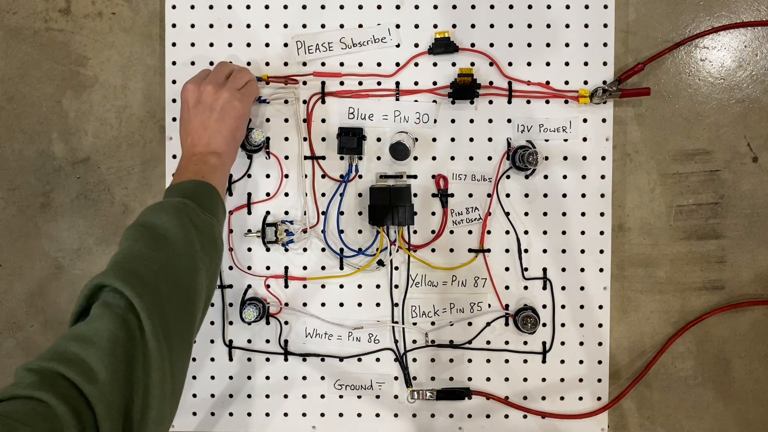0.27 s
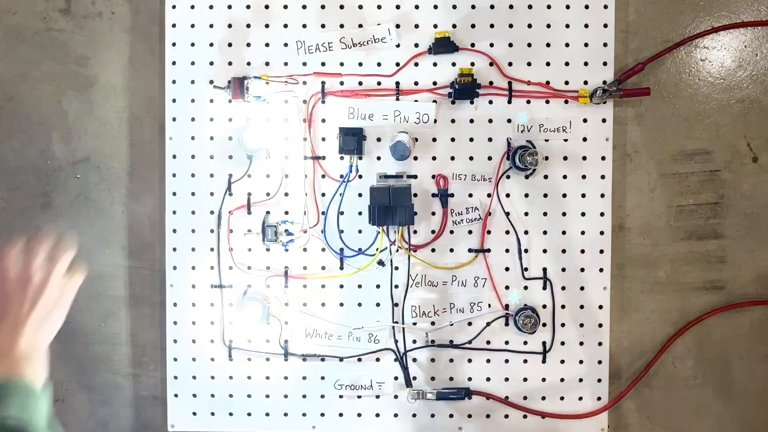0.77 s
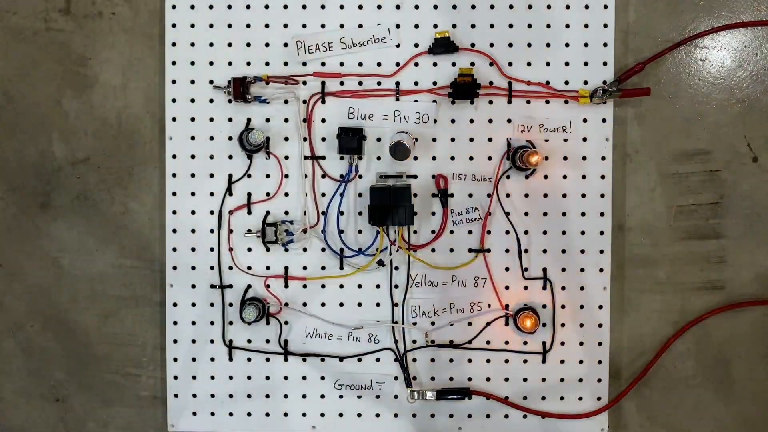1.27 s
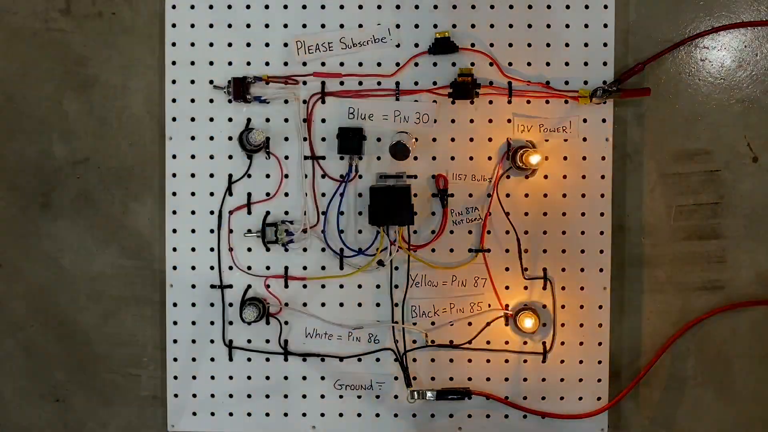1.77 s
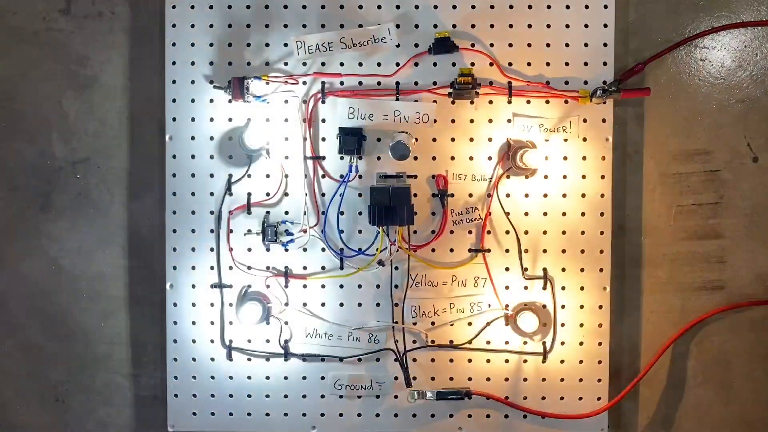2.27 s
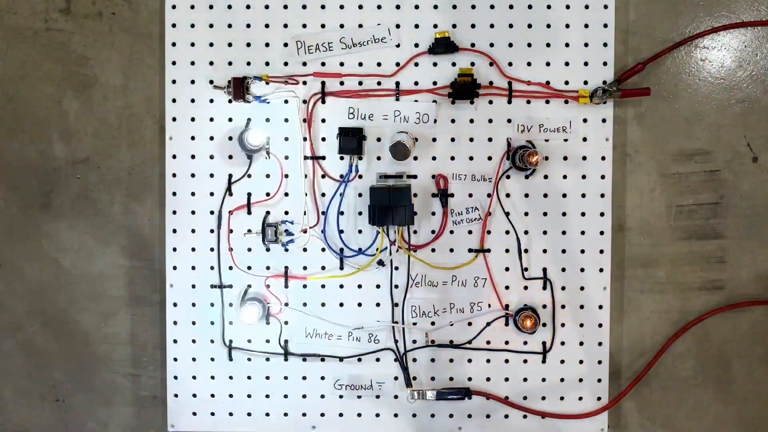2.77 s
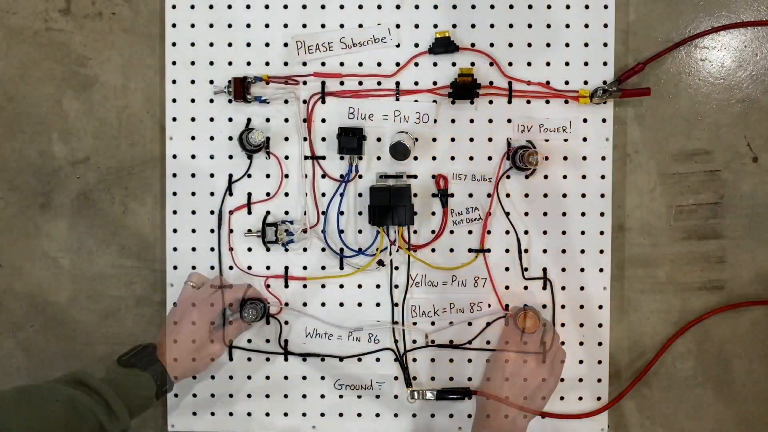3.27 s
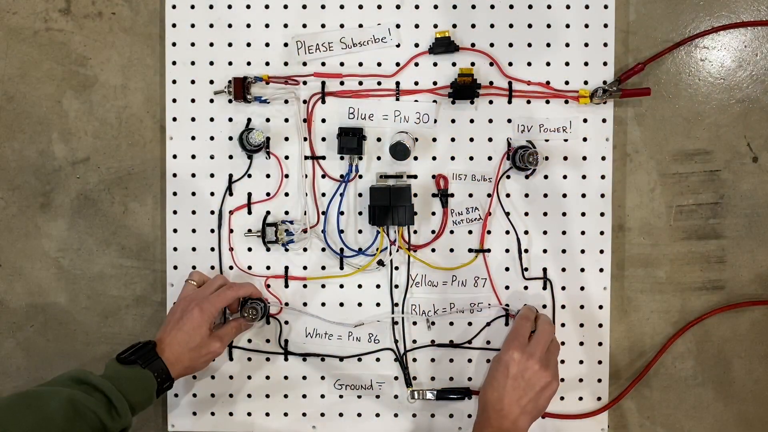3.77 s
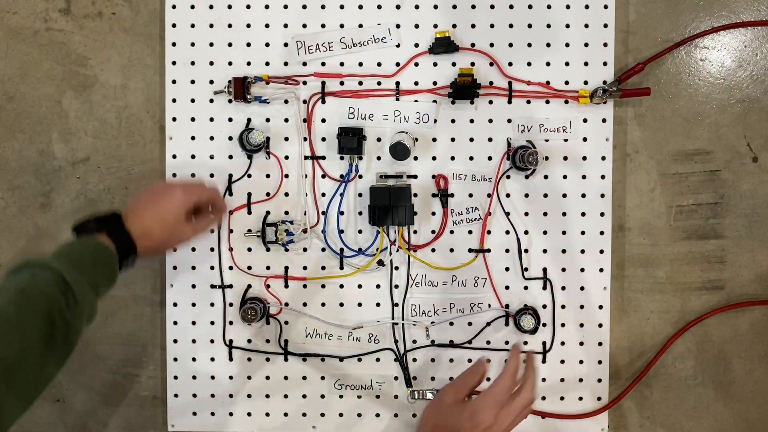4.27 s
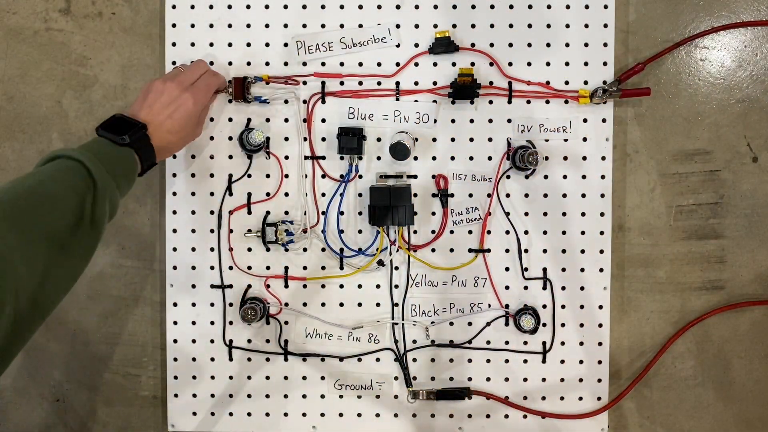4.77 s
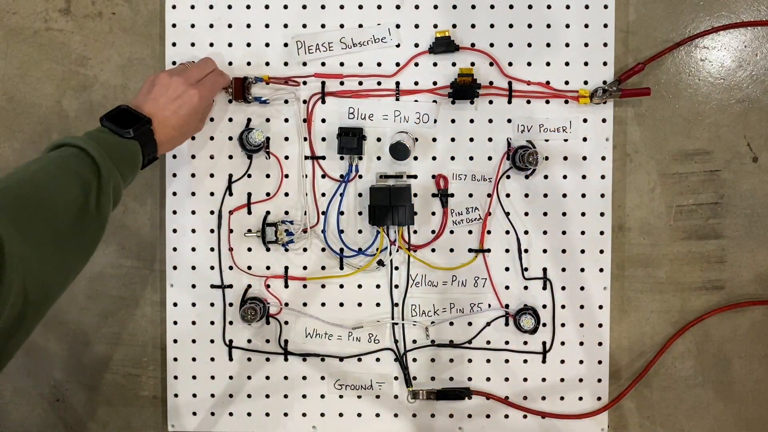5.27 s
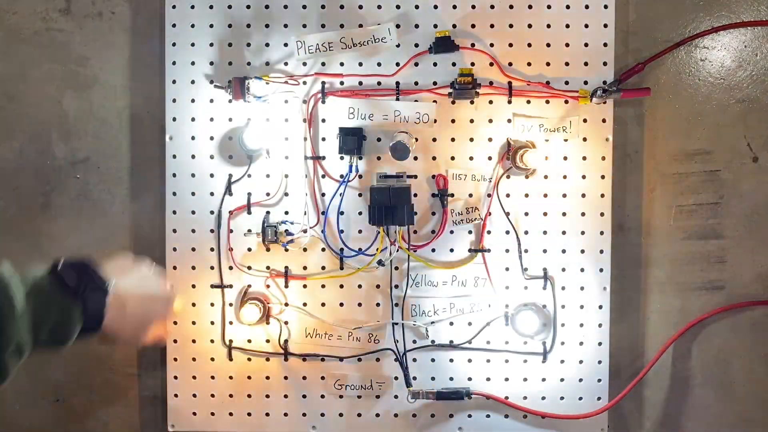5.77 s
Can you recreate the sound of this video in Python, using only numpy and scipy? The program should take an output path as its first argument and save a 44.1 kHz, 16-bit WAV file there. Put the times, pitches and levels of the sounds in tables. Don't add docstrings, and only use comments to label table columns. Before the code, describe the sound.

A close, quiet stereo scene in a concrete garage. Soft finger touches and a dull knock at 0.14 s lead to a very sharp toggle snap at 0.26 s, several contact bounces within about twenty milliseconds, with bright ringing and a short hard-walled tail; a softer knock follows near 0.48. From 0.55 to about 2.2 a far bird gives five hoarse, evenly spaced caws over a faint, pulsing 73 Hz vehicle drone. Small dry ticks dot 1.1 to 3.0. From 3.0 the vehicle nears: rumble, tyre roar and low engine surges swell, strongest around 4.2 to 5. At 3.57 a crisp tick starts hand scrapes, dull knocks and short socket creaks until about 4.0. Light rubs and taps resume at 4.5. A second, slightly softer switch snap hits at 5.15 and rings. A light tap at 5.5, then faint rubbing under a deep, steady engine boom to the end, just past 6.

```python
import sys
import numpy as np
from scipy import signal
from scipy.fft import rfft, irfft, next_fast_len
from scipy.io import wavfile

SR = 44100
rng = np.random.default_rng(int(sys.argv[2]) if len(sys.argv) > 2 else 0)


def store_pcm(level_fs):
    pcm = np.round(np.clip(level_fs, -1, 1) * 32767).astype(np.int16)
    wavfile.write(sys.argv[1], SR, np.atleast_2d(pcm).T)


def gain_from_db(level_db):
    decades = np.asarray(level_db, float) / 20
    return 10 ** decades


N = 265085

# f/Hz, level/dB
RUMBLE_SPECTRUM = [(15, -62), (25, -37.5), (49, -8), (70, -11.5), (83, -16.5), (97, -15.5), (204, -22),
                   (245, -17.5), (1000, -51), (1300, -75.5), (2200, -120)]
# f/Hz, level/dB
ROAR_SPECTRUM = [(240, -20.5), (400, -1.5), (431, -7.5), (499, -5), (715, -6.5), (1180, -15), (3210, -32.5),
                 (5000, -40.5), (6500, -52), (11000, -120)]
# f/Hz, level/dB
AIR_SPECTRUM = [(25, -12.5), (60, 1.5), (150, -6.5), (500, -34), (1500, -41.5), (3000, -40), (5500, -40.5),
                (10000, -48.5), (16000, -60)]
AIR_DB = -61.5
# far level/dB, drift/(dB/s), arrival t/s, rise/s, near level/dB, fade/(dB/s)
RUMBLE_PASS = (-71, .8, 3, 0.32, -44, 0.84)
# far level/dB, drift/(dB/s), arrival t/s, rise/s, near level/dB, fade/(dB/s)
ROAR_PASS = (-69, -2.5, 3.17, .16, -51, 3.5)
# t/s, level/dB
CAWS = [
    (.55, -62),
    (.845, -61.5),
    (1.144, -61.5),
    (1.456, -61.5),
    (1.774, -60.5),
]
# f/Hz, width/Hz, level/dB
THROAT = [(1265, 70, 4.5), (1355, 90, 6), (1435, 70, 4), (1775, 53, 0), (2075, 240, -5)]
# t/s, length/s, f/Hz, glide/(Hz/s), level/dB
DRONE = [(.05, 0.13, 73.4, -15, -59.5), (.2, 0.11, 74.8, 0.1, -59), (.33, 0.15, 73, -2, -58),
         (.6, 0.17, 74, 28, -56.5), (.79, 0.098, 76, -7, -49), (.96, 0.54, 73.75, 0.1, -50),
         (1.52, 0.21, 73.4, 1, -55), (1.66, 0.42, 72.8, 0.5, -49.5), (2.05, .24, 72.5, 0, -44.5),
         (2.25, .15, 73.5, -3, -53), (2.46, .1, 73.7, 1.5, -52), (2.54, 0.36, 72.4, 0, -52.5)]
# t/s, length/s, f/Hz, glide/(Hz/s), level/dB
SURGES = [(2.9, 0.24, 58, -1.3, -54), (3.28, 0.366, 66, 0.5, -41.5), (3.6, 0.16, 65.8, -4, -40),
          (3.77, 0.12, 65, 5, -37), (3.88, 0.18, 65.1, 1, -38.5), (4.7, 0.13, 66, 10, -35.5),
          (4.18, 0.15, 66.5, 45, -29.5), (4.33, 0.195, 43, 41, -34.5), (4.48, 0.12, 55, 34, -31),
          (4.28, 0.13, 66, -39, -39), (4.05, .15, 58, 70, -38), (3.93, .08, 262, 0, -47),
          (4.05, .12, 285, 60, -50), (4.23, .08, 318, 0, -48), (4.56, .1, 192, 0, -47),
          (5.83, .07, 290, 0, -48), (3.25, 0.22, 199, 3.5, -47.5), (2.95, 0.35, 51, -1.5, -55),
          (3.2, 0.48, 55, -2.5, -50.5), (3.66, 0.15, 52, 1, -40), (4.4, .32, 53, -2, -47),
          (4.57, .16, 60, 20, -41), (3.08, 0.506, 196, 7, -54), (3.62, 0.204, 197, -10, -45.5),
          (4.5, 0.18, 210, 7, -50.5), (4.66, 0.236, 259, -4, -50)]
# t/s, f/Hz, level/dB
FIRING = [
    (3.03, 129.1, -61.5),
    (3.36, 132.6, -48),
    (3.55, 130.6, -46.5),
    (3.8, 131, -47.5),
    (4.05, 130, -49),
    (4.37, 129, -48.5),
    (4.65, 127.1, -46),
    (5.3, 125.7, -58.5),
    (5.7, 132, -57.5),
]
# multiple of firing f, level/dB
FIRING_ORDERS = [(1, 0.15), (1.5, -9.5), (2, -10.5)]
# t/s, f/Hz, level/dB
BOOM = [
    (4.66, 64.6, -46),
    (4.75, 64.1, -35),
    (4.89, 63.48, -27.5),
    (4.99, 66.9, -29),
    (5.29, 67.9, -33.5),
    (5.88, 65.76, -29.5),
    (5.95, 66.33, -29.5),
    (6.06, 69.3, -27.5),
]
# f/Hz, width/Hz, from t/s, to t/s, level/dB
DRUMMING = [
    (300, 180, 3.05, 4.72, -53),
    (275, 90, 3.3, 4.15, -50),
    (170, 36, 3.0, 4.48, -58),
    (113.2, 11, 3.9, 5.03, -52.5),
    (283.3, 150, 5.5, 6.4, -56),
]
# f/Hz, width/Hz, from t/s, to t/s, level/dB
WHINES = [
    (148, 4, .3, 1.5, -72),
    (300, 20, .8, 2.1, -79),
    (600, 50, 1.2, 3.1, -80),
    (6450, 250, 3.1, 3.9, -88),
    (6450, 300, 4.3, 5.2, -92),
]
# f/Hz, t60/s
GARAGE_T60 = [(250, 0.27), (1000, 1), (2000, 0.64), (4000, 0.59), (8000, 0.62), (14000, 0.3)]
# t/s, level/dB, prominent ring f/Hz, ring level/dB
SNAP_ECHO = [
    (.258, -5, 4200, 3),
    (5.154, -8, 3000, 4),
]
# f/Hz, level/dB
SNAP_COLOUR = [(400, -38), (900, -9.5), (1400, 0), (2000, -0.5), (3000, -0.5), (4900, -4.5), (6300, -2),
               (8400, -5.5), (10500, -7), (13500, -0.5), (16000, -13)]
# t/s, f/Hz, width/Hz, level/dB, t60/s
HUMS = [(.268, 4230, 180, -60, .5), (.268, 1390, 300, -54, .9), (.268, 2950, 350, -56, .55),
        (.268, 2400, 300, -59, .55), (.268, 6130, 300, -62, .4), (5.168, 3020, 100, -55, .5),
        (5.168, 2150, 400, -59.5, .4), (5.168, 4900, 500, -58, .4), (5.168, 4000, 300, -62, .4),
        (5.168, 1400, 400, -61, .5)]
# peak t/s, rise/s, fall/s, board scrape level/dB, skin and cloth hiss level/dB
RUBS = [(.006, 0.0056, 0.11, -75, -82), (.16, 0.1, 0.12, -66, -95), (.245, 0.036, .02, -68, -83),
        (.49, 0.091, 0.052, -61, -75), (.82, 0.67, 1, -82, -79.5), (1.04, 0.02, 0.23, -78, -72),
        (1.17, 0.14, 0.32, -70.5, -74.5), (1.526, 0.056, 0.058, -82.5, -76.5),
        (2.312, 0.033, 0.045, -89, -79.5), (2.626, 0.014, 0.057, -92.5, -75),
        (3.573, .01, 0.08, -45.5, -60.5), (3.698, 0.062, 0.055, -48.5, -66),
        (3.815, 0.098, 0.057, -48, -71), (3.93, 0.077, 0.28, -59, -65.5), (4.44, 0.64, 0.29, -88, -76.5),
        (4.522, 0.0091, 0.031, -62, -80), (4.6, 0.068, 0.25, -70, -78), (4.705, 0.052, 0.041, -57, -68.5),
        (4.88, 0.23, .18, -60.5, -65.5), (5.14, 0.25, 0.0094, -71, -81.5), (5.4, .2, 0.28, -74, -75),
        (5.508, 0.013, 0.031, -59, -73.5), (5.7, 0.9, 0.88, -70, -80), (5.96, 0.06, .2, -70, -77)]
RUB_SPAN_DB = 20
# f/Hz, level/dB
SCRAPE = [(500, -18), (850, -6.5), (1100, -1.5), (1350, -2), (1800, -2.5), (2950, -8.5), (3400, -12),
          (6000, -30.5)]
# f/Hz, level/dB
HISS = [(1500, -9.5), (3000, -1), (4000, -1.5), (5500, 1), (7500, -6), (10500, -6), (13000, -5),
        (16000, -14)]
# f/Hz, width/Hz, from t/s, to t/s, level/dB
SQUEAKS = [
    (3900, 800, 3.87, 4.12, -70),
    (4220, 170, .37, .55, -72),
    (5300, 700, 4.77, 4.92, -67),
]
# from t/s, to t/s, from f/Hz, to f/Hz, level/dB
TWISTS = [(3.565, 3.609, 1390, 1170, -44.5), (3.566, 3.612, 2250, 2980, -50),
          (3.568, 3.606, 1730, 1790, -51.5), (3.57, 3.611, 4180, 3880, -57),
          (3.664, 3.701, 970, 1300, -52.5), (3.695, 3.73, 1300, 960, -49.5),
          (3.67, 3.722, 2860, 2080, -55.5), (3.678, 3.72, 1700, 1590, -56), (3.753, 3.8, 1000, 1150, -53),
          (3.795, 3.838, 1150, 1320, -48.5), (3.765, 3.84, 2570, 2960, -53.5),
          (3.775, 3.832, 2120, 1900, -54.5), (3.79, 3.83, 630, 615, -56), (3.801, 3.831, 4100, 3900, -64),
          (3.61, 3.67, 2800, 2500, -61), (3.84, 3.87, 2700, 2500, -64), (3.9, 3.97, 4100, 3730, -63.5),
          (3.941, 3.99, 1100, 1350, -60), (0.212, 0.235, 5400, 5250, -76)]
# t/s, peak level/dB, f/Hz
TICKS = [(.208, -69, 11500), (.225, -68, 9000), (1.0819, -58, 4000), (1.6334, -47, 9500),
         (1.634, -56, 4700), (1.714, -56, 9000), (1.718, -51, 5200), (1.723, -55, 4500),
         (1.9335, -55, 11000), (2.085, -47.5, 8700), (2.18, -62, 4500), (2.3085, -64, 3200),
         (2.422, -63, 4500), (2.6254, -47.5, 8500), (3.012, -61, 10500), (3.5738, -35, 5800),
         (3.5745, -44, 10500), (2.0865, -60, 3500), (2.245, -66, 5000), (2.31, -64, 5200),
         (3.813, -50, 5000), (3.885, -53, 12000)]
# t/s, peak level/dB, f/Hz
KNOCKS = [(.0062, -47.5, 1330), (0.085, -58, 1210), (.1446, -31, 976), (.2015, -52, 1000),
          (.2095, -52, 1100), (.138, -55, 1150), (.168, -54, 1050), (0.4768, -42, 1328), (1.227, -52, 420),
          (1.237, -56, 560), (1.281, -56, 480), (.459, -49.5, 1270), (3.627, -36.5, 330), (3.655, -37, 380),
          (3.675, -38, 400), (3.695, -39, 477), (4.5226, -51, 808), (4.608, -47, 900), (4.683, -46, 996),
          (4.698, -39.5, 920), (4.711, -46, 880), (4.811, -45, 1152), (4.952, -47.5, 1240),
          (5.509, -47, 906)]
# t/s, peak level/dB, f/Hz, t60/s
BLOWS = [(.2572, -30.5, 2370, .01), (0.2543, -38, 1800, .01), (.2585, -24, 1170, 0.012),
         (.26, -27, 1420, .012), (0.2603, -25.5, 3050, 0.012), (0.2632, -33.5, 1480, .014),
         (.267, -32, 2300, .012), (.2685, -35, 3200, .006), (5.1507, -36, 2380, 0.011),
         (5.1525, -34, 1120, .012), (5.1548, -25.5, 1460, .009), (5.1564, -26.5, 3050, 0.01),
         (5.1585, -28.5, 1000, 0.013), (5.1617, -37, 1450, 0.0097), (5.166, -41, 1210, 0.011),
         (5.168, -38, 2820, .008)]
# t/s, contact level/dB, contact f/Hz, board knock level/dB
SNAPS = [(.254, -31, 11000, -44), (.2551, -26, 13000, -40), (.2562, -31, 9000, -38),
         (.2573, -20, 9000, -30), (.2582, -17, 6500, -27), (.2596, -28, 5000, -24), (.2612, -21, 8500, -27),
         (.2619, -21, 13500, -29), (.2627, -22, 7000, -31), (.2645, -29, 9000, -31),
         (.2672, -31, 6500, -33), (5.15, -34, 11000, -44), (5.1508, -31, 9000, -42),
         (5.1517, -23, 12500, -34), (5.1528, -31, 6000, -38), (5.1543, -19, 8000, -28),
         (5.1557, -32, 5000, -25), (5.1573, -22, 13500, -28), (5.158, -19, 7500, -25),
         (5.1588, -24, 13000, -29), (5.1602, -30, 9000, -31), (5.1632, -32, 6500, -33)]
# multiple of contact f, level/dB
CONTACT = [(.1, -32), (0.299, -7.5), (0.602, -11), (1, 6.5), (1.5, -17), (3, -7.5)]
# f/Hz, level/dB, t60/s
BOARD = [(930, -2, .014), (1110, 4, .016), (1440, -1, .02), (1850, -7, .012), (2290, -5, .014),
         (2700, -6, .014), (3050, 1, .018), (3600, -12, .012), (4200, -14, .016)]
# f/Hz, level/dB
THUD = [(400, -34), (800, -10), (1200, 3.5), (2000, -6), (3000, -0.5), (4500, -19.5), (7000, -27.5)]
# f/Hz, left lead/rad
PORT_PHASE = [(60, .04), (300, 0), (1300, -.2), (1700, -.05), (2750, .9), (4800, .4), (5850, 1.5),
              (6900, 2.8), (7900, 3.8), (9000, 4.7), (10000, 6.1), (11500, 7), (13000, 9.2), (14300, 9.9),
              (16000, 12.3)]
# f/Hz, likeness 0-1
PORT_SAME = [(70, .99), (130, .985), (250, .96), (450, .55), (800, .45), (1500, .55), (2700, .45),
             (5000, .65), (7000, .985), (16000, .985)]
# f/Hz, left-right level/dB
PORT_DB = [(100, -.1), (300, -1.5), (600, -1.8), (1000, -.5), (2000, -.2), (16000, 0)]
# f/Hz, left-right level/dB
NEAR_DB = [(500, 0), (1000, -1.3), (2000, -2.3), (3000, -4.5), (4200, -3), (5200, 0), (16000, 0)]
# f/Hz, level/dB
SPREAD = [(60, -50), (300, -40), (900, -22), (1500, -15), (3000, -16), (4000, -10), (5500, -13),
          (7000, -22), (16000, -24)]
LEFT_RIGHT = np.array([[1], [-1]])


def evened(x):
    return x / np.sqrt(np.mean(x ** 2) + 1e-20)


def peaked(x):
    return x / abs(x).max()


def read(points, hz):
    f, value = np.transpose(points)
    return np.interp(np.log(hz + 1), np.log(f + 1), value)


def curve(rows, column, t):
    rows = np.asarray(rows)
    return np.interp(t, rows[:, 0], rows[:, column])


def add(mix, s, sound):
    part = mix[round(s * SR):][:len(sound)]
    part += sound[:len(part)]


def coloured(x, points):
    size = next_fast_len(x.shape[-1])
    gain = gain_from_db(read(points, np.fft.rfftfreq(size, 1 / SR)))
    return irfft(rfft(x, size) * gain, size)[..., :x.shape[-1]]


def through(x, gain):
    pad = 4096
    wide = np.pad(x, [(0, 0)] * (x.ndim - 1) + [(pad, pad)], "reflect")
    size = next_fast_len(wide.shape[-1])
    spectrum = rfft(wide, size) * gain(np.fft.rfftfreq(size, 1 / SR))
    return irfft(spectrum, size)[..., pad:pad + N]


def resonate(x, modes):
    t, out = np.arange(x.shape[-1]) / SR, 0
    for hz, width, db in modes:
        turn, r = np.exp(2j * np.pi * hz * t), np.exp(-np.pi * width / SR)
        baseband = signal.lfilter([(1 - r) ** 2], [1, -2 * r, r * r], x / turn)
        out = out + gain_from_db(db) * 2 * (turn * baseband).real
    return out


def wander(per_s):
    t = np.arange(0, N + 64, 64) / SR
    rates_hz = np.geomspace(per_s / 20, per_s, 16)
    slow = sum(np.sin(2 * np.pi * (f * t + rng.random())) / np.sqrt(f) for f in rates_hz)
    return evened(np.interp(np.arange(N) / SR, t, slow))


def bands(rows, fade_s):
    out = np.zeros(N)
    for hz, width, start, end, db in rows:
        t = np.arange(0, end - start, 1 / SR)
        gate = np.clip(np.minimum(t, end - start - t) / fade_s, 0, 1)
        whistle = resonate(rng.standard_normal(len(t)), [(hz, width, 0)])
        add(out, start, gain_from_db(db) * gate * evened(whistle))
    return out


def passing(far_db, drift, arrives, takes, near_db, fade):
    t = np.arange(N) / SR
    far = far_db + drift * t
    step = (1 + np.tanh((t - arrives) / takes / 2)) / 2
    return far + step * (near_db - fade * (t - arrives) - far)


def wash():
    out = 0
    layers = ((RUMBLE_SPECTRUM, passing(*RUMBLE_PASS)), (ROAR_SPECTRUM, passing(*ROAR_PASS)), (AIR_SPECTRUM, AIR_DB))
    for points, db in layers:
        noise = coloured(rng.standard_normal((2, N)), points)
        out = out + evened(noise) * gain_from_db(db + 0.55 * wander(18))
    return out


def caws():
    out, t = np.zeros(N), np.arange(SR // 2) / SR
    bend = 1 - .02 * np.exp(-t / .04) - .1 * t / 2
    throat = [(hz * bend, width, db) for hz, width, db in THROAT]
    for s, db in CAWS:
        harsh = rng.standard_normal(len(t)) * (1 + 0.28 * np.cos(2 * np.pi * 75 * t))
        shape = np.clip(t / 0.042, 0, 1) * gain_from_db(-60 * np.maximum(t - .1, 0) / 0.9)
        low = resonate(harsh, throat[:3])
        high = resonate(harsh, throat[3:]) * gain_from_db(-60 * t / 1.46)
        pip = np.sin(2 * np.pi * (throat[3][0] * t + rng.random())) * np.exp(-((t - .03) / 0.022) ** 2)
        add(out, s, gain_from_db(db) * (shape * (low + high) / np.std(low) + gain_from_db(-4.5) * pip))
    return out


def swells(rows):
    out, drift = np.zeros(N), np.cumsum(1 + 0.01 * wander(12)) / SR
    edge_s = 0.056
    for s, length, hz, glide, db in rows:
        start = round(s * SR)
        t = np.arange(0, length, 1 / SR)[:N - start]
        edge = np.sin(np.pi / 2 * np.clip(np.minimum(t, length - t) / edge_s, 0, 1)) ** 2
        turns = hz * drift[start:][:len(t)] + glide * t ** 2 / 2
        add(out, s, gain_from_db(db) * np.sqrt(2) * edge * np.sin(2 * np.pi * turns))
    return out


def order(rows, multiple, db, waver_db):
    t = np.arange(N) / SR
    fade = np.clip(np.minimum(t - rows[0][0], rows[-1][0] - t) / 0.044, 0, 1)
    hz = multiple * curve(rows, 1, t) * (1 + .012 * wander(12))
    turns = np.cumsum(hz) / SR + rng.random()
    level = gain_from_db(curve(rows, 2, t) + db + waver_db * wander(15))
    return fade * level * np.sqrt(2) * np.sin(2 * np.pi * turns)


def engine():
    firing = sum(order(FIRING, k, db, waver_db=1.8) for k, db in FIRING_ORDERS)
    low = swells(DRONE + SURGES) + order(BOOM, 1, 0, waver_db=0.3)
    return low + firing + bands(WHINES, fade_s=0.099) + bands(DRUMMING, fade_s=0.36)


def garage(x):
    tail = np.zeros((2, SR))
    at = np.arange(260, SR - 20, 20) + rng.integers(0, 20, (2, (SR - 261) // 20))
    np.put_along_axis(tail, at, rng.choice([-1., 1.], at.shape), 1)
    hz, t, z = signal.stft(tail, SR, nperseg=256)
    decay = gain_from_db(-60 * t / read(GARAGE_T60, hz)[:, None])
    tail = signal.istft(z * decay, SR, nperseg=256)[1]
    return signal.fftconvolve(x[None], tail / np.linalg.norm(tail[0]), axes=1)[:, :N]


def snap_echo():
    out, push = np.zeros(N), signal.unit_impulse(1024, 100)
    for s, db, hz, ring_db in SNAP_ECHO:
        ringing = coloured(push, [(.94 * hz, 0), (hz, ring_db), (1.06 * hz, 0)])
        add(out, s - 100 / SR, gain_from_db(db) * coloured(ringing, SNAP_COLOUR))
    return out


def hums():
    out, t = np.zeros(N), np.arange(SR // 2) / SR
    for s, hz, width, db, t60 in HUMS:
        shape = gain_from_db(db - 30 * t / t60 - 30 * (t / t60) ** 2) * np.clip(t / .005, 0, 1)
        add(out, s, shape * evened(resonate(rng.standard_normal(len(t)), [(hz, width, 0)])))
    return out


def hands():
    grain_level = gain_from_db(3.5 * np.minimum(rng.exponential(1, N), 4))
    slips = (rng.random(N) < 1800 / SR) * grain_level * rng.choice([-1., 1.], N)
    scrape = evened(coloured(slips + .35 * rng.standard_normal(N), SCRAPE))
    board = resonate(scrape, [(hz, 1.5 / t60, db) for hz, db, t60 in BOARD])
    scrape = evened(scrape + 0.31 * evened(board))
    hiss = evened(coloured(rng.standard_normal(N) + 0.12 * slips, HISS))
    t, power = np.arange(N) / SR, np.zeros((2, N))
    for s, rise, fall, scrape_db, hiss_db in RUBS:
        n = slice(max(round((s - 2 * rise) * SR), 0), round((s + 2 * fall) * SR))
        drop_db = RUB_SPAN_DB * np.maximum((s - t[n]) / rise, (t[n] - s) / fall) ** 1.48
        power[:, n] += gain_from_db(2 * (np.array([[scrape_db], [hiss_db + 5.5]]) - drop_db))
    return np.sqrt(power[0]) * scrape + np.sqrt(power[1]) * hiss


def twists():
    out, t = np.zeros(N), np.arange(4096) / SR
    for start, end, from_hz, to_hz, db in TWISTS:
        length = end - start
        slips = (rng.random(len(t)) < 1600 / SR) * rng.standard_normal(len(t))
        slips = slips + 0.052 * rng.standard_normal(len(t))
        slide_hz = from_hz + (to_hz - from_hz) * t / length / 2
        creak = resonate(slips, [(slide_hz, .2 * from_hz, 0)])
        gate = np.clip(np.minimum(t, length - t) / .004, 0, 1)
        add(out, start, gain_from_db(db) * gate * evened(creak))
    return out


def ticks():
    out, t = np.zeros(N), np.arange(2048) / SR
    for s, db, hz in TICKS:
        spectrum = [(hz / 4, -34), (hz / 2, -9), (hz, 0), (1.5 * hz, -10), (3 * hz, -28)]
        grit = coloured(rng.standard_normal(len(t)), spectrum)
        decay = gain_from_db(-60 * t / .009) + .1 * gain_from_db(-60 * t / .09)
        add(out, s, gain_from_db(db) * peaked(grit * decay))
    return out


def knocks():
    out, t = np.zeros(N), np.arange(2048) / SR
    for s, db, hz in KNOCKS:
        spectrum = [(hz / 2, -25), (hz, 0), (1.5 * hz, -6), (3 * hz, -27), (8 * hz, -62)]
        thud = coloured(rng.standard_normal(len(t)), spectrum)
        ring = np.sin(2 * np.pi * hz * t) + .8 * evened(thud)
        shape = gain_from_db(-60 * t / .022) * (1 - np.exp(-t / .0008))
        add(out, s, gain_from_db(db) * peaked(ring * shape))
    return out


def blows():
    out, t = np.zeros(N), np.arange(1024) / SR
    for s, db, hz, t60 in BLOWS:
        shape = gain_from_db(-60 * t / t60) * (1 - np.exp(-t / 0.00048))
        add(out, s, gain_from_db(db) * peaked(np.sin(2 * np.pi * hz * t) * shape))
    return out


def switch():
    out, t = np.zeros(N), np.arange(4096) / SR
    body_db = -8
    for s, contact_db, hz, knock_db in SNAPS:
        contact = coloured(rng.standard_normal(len(t)), [(k * hz, db) for k, db in CONTACT])
        burst = contact * t * np.exp(-t / 0.00062)
        ring = 0
        for f, db, t60 in BOARD:
            level = gain_from_db(db + 5.0 * rng.standard_normal() - 60 * t / t60)
            ring = ring + level * np.sin(2 * np.pi * (f * t + rng.random()))
        thud = coloured(rng.standard_normal(len(t)), THUD) * gain_from_db(-60 * t / .016)
        body = (peaked(ring) + .9 * peaked(thud)) * (1 - np.exp(-t / .0006))
        add(out, s - .0004, gain_from_db(contact_db) * peaked(burst) + gain_from_db(knock_db + body_db) * peaked(body))
    return out


def scene():
    small = knocks() + ticks() + twists()
    near = switch() + small + hands() + bands(SQUEAKS, fade_s=0.036) + engine() + blows()
    direct = through(near, lambda hz: gain_from_db(read(NEAR_DB, hz) / 2 * LEFT_RIGHT))
    taps = rng.standard_normal(1024) * gain_from_db(-60 * np.arange(1024) / SR / .025)
    bench = signal.oaconvolve(near, taps / np.linalg.norm(taps))[:N]
    bounce = through(bench, lambda hz: gain_from_db(read(SPREAD, hz)))
    far = np.stack([caws() + hums(), caws() + hums()])
    diffuse = garage(snap_echo() + gain_from_db(-14) * small) + wash() + far

    def sharing(hz):
        return np.sqrt((1 + np.clip(read(PORT_SAME, hz), 0, 1) * LEFT_RIGHT) / 2)
    common, apart = through(diffuse, sharing)
    return direct + common + (apart + bounce) * LEFT_RIGHT


def top_cut(x):
    return signal.sosfilt(signal.butter(12, 16650, fs=SR, output="sos"), x)


def record(dry):
    edge_hz, stop_s = 15950, .004

    def port(hz):
        half = gain_from_db(read(PORT_DB, hz) / 2) * np.exp(.5j * read(PORT_PHASE, hz))
        return gain_from_db(-np.clip(hz - edge_hz, 0, None) / 30) * [half, 1 / half]
    stop = np.sin(np.pi / 2 * np.clip(np.arange(N, 0, -1) / SR / stop_s, 0, 1))
    return top_cut(stop * through(dry, port))


dry = scene()
out = record(dry)
store_pcm(out)
```